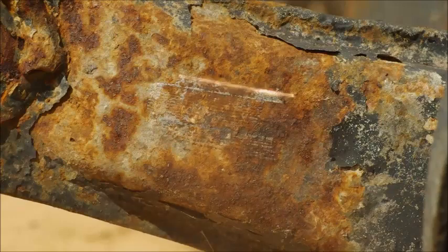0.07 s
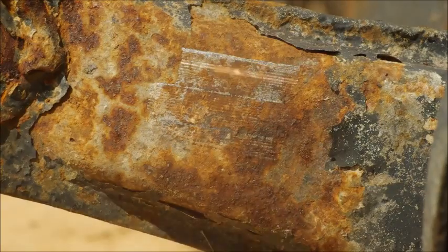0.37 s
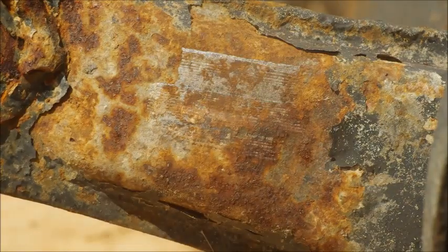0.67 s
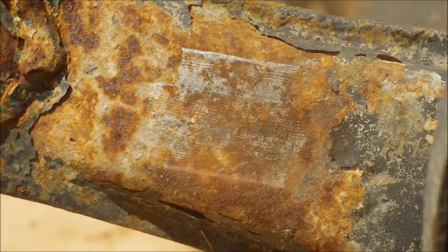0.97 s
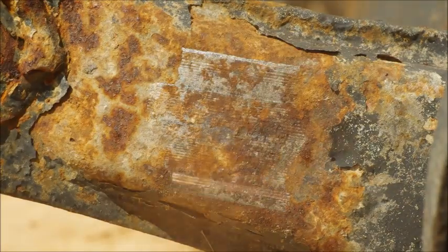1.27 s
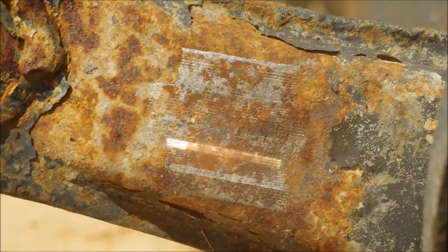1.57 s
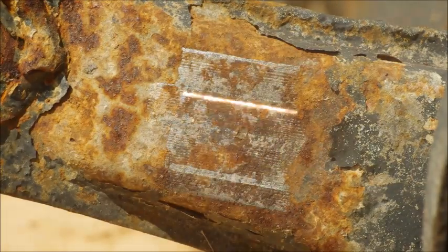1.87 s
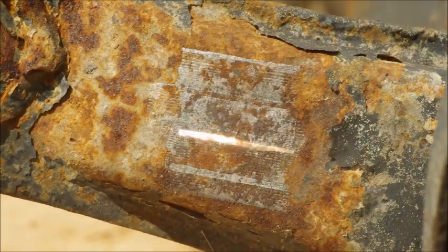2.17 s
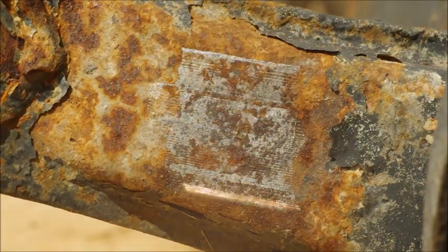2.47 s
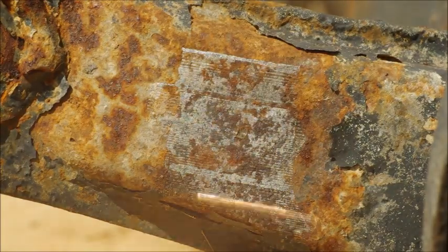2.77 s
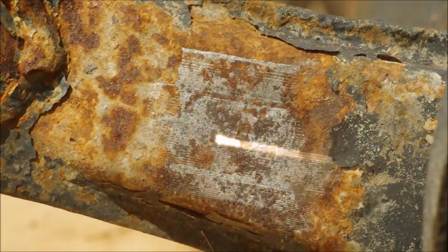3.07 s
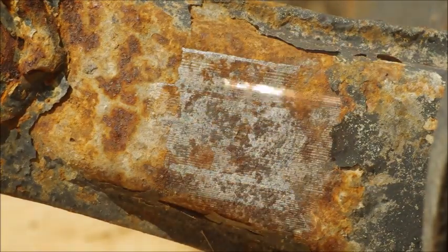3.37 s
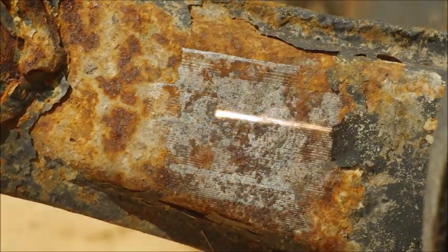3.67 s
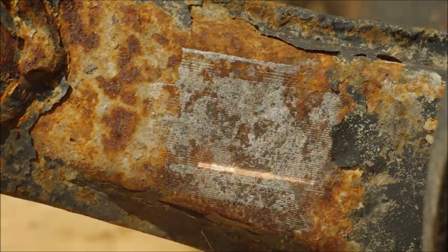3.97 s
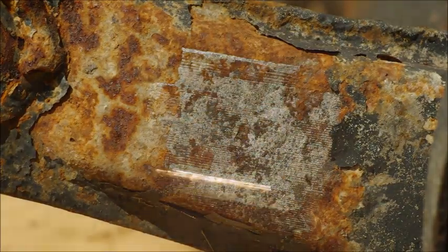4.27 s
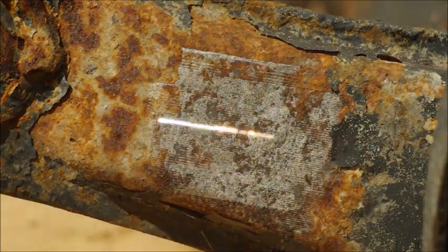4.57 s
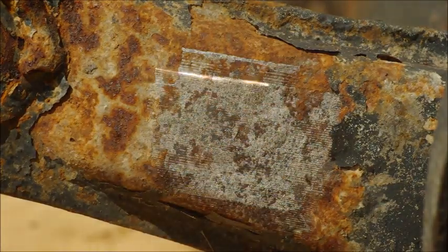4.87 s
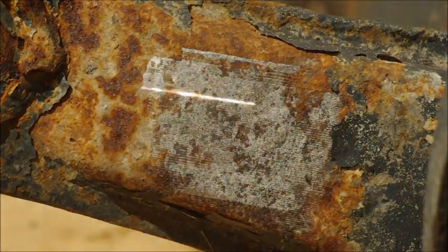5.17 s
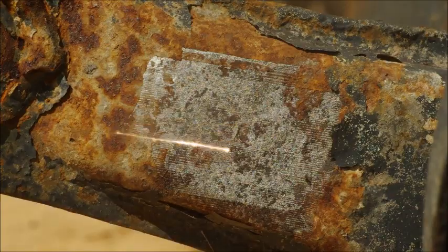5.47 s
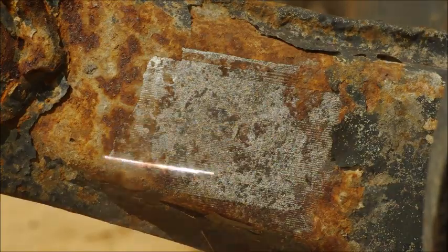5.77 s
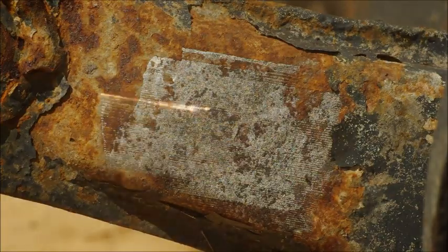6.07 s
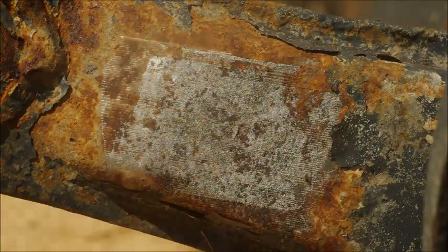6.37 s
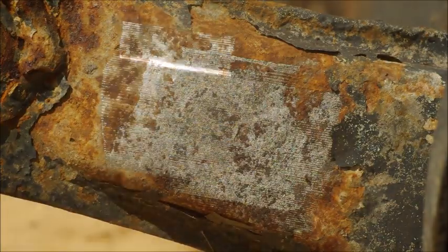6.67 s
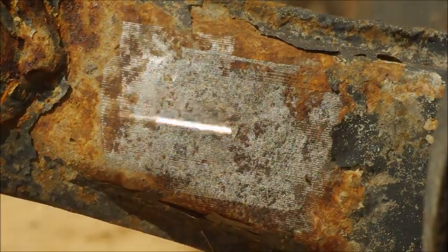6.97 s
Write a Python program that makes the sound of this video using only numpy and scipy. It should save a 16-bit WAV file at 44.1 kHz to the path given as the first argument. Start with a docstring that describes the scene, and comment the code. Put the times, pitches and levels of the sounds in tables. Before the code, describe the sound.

Close, continuous sizzling and raspy buzzing from a laser sweeping over rusty metal, with small crackles and faint air buffeting.

```python
"""Laser rust removal, close up.

A cleaning laser sweeps a line on a steel part in a workshop. Bursting rust sizzles; each sweep meets
nearly the same patches, so it buzzes. Narrow peaks colour the hiss and give a faint hum near 575 Hz.
The line is led up and down, which shifts close reflections. At instants the hiss gives way to glassy
tones. Moving air buffets the microphone."""
import sys
import numpy as np
from scipy import signal
from scipy.fft import rfft, irfft, next_fast_len
from scipy.io import wavfile
from scipy.ndimage import uniform_filter1d, map_coordinates

SR = 44100
rng = np.random.default_rng(int(sys.argv[2]) if len(sys.argv) > 2 else 0)


def store_wav(level_fs):
    """Save 16-bit WAV to argv[1]."""
    pcm = np.round(np.clip(np.atleast_2d(level_fs), -1, 1) * 32767)
    wavfile.write(sys.argv[1], SR, pcm.T.astype(np.int16))


N = 314433
SCAN_HZ, TOP_HZ = 91.74, 15650


def ablation(body_depth, rasp_depth, hiss_trim_db, rasp_trim_db):
    """Hiss, rasp and spits of bursting rust; hiss and rasp throb once a sweep."""
    # burst spectra: f/Hz, level/dB
    hiss_spectrum = [(300, -40), (1500, -18.5), (2000, -13), (2500, -5.5), (3200, -7), (4000, -5),
                     (5500, 2), (6400, -2.5), (7500, 0), (8700, -1), (10000, -7.5), (12000, -6.5),
                     (14000, -15), (15700, -21)]
    rasp_spectrum = [(40, -37), (120, -21.5), (270, -5), (550, 0), (850, 2), (1600, -2.5), (2500, -4.5),
                     (5000, -75), (15000, -45.5)]
    repeat_share = 0.68 + 0.22 * line_height()  # sweeps are more alike towards the top
    peaks = narrow_peaks()
    hiss_response = colour(hiss_spectrum) * peaks
    throb = throbbing(patch_db=1.5, flake_db=2.5)
    source = sweep_bursts(repeat_share, memory=0.52, blur_hz=5000)
    # thick rust gives bigger, lower bursts, so the body throbs more deeply than the top
    body_band = 1 / (1 + (bins() / 4400) ** 6)
    body = filtered(unit(source * throb ** body_depth), hiss_response * body_band)
    top = filtered(unit(source * throb), hiss_response * (1 - body_band))
    hiss = unit(brighten(body + top, body_share=0.83, middle_share=0.58))
    rasp = sweep_bursts(repeat_share, memory=0.58, blur_hz=4500) * throb ** rasp_depth
    rasp = unit(filtered(rasp, colour(rasp_spectrum) * peaks))
    hiss_gain, rasp_gain = flaring(rasp_bed_db=-47)
    sizzling = hiss * hiss_gain * undb(hiss_trim_db) + rasp * rasp_gain * undb(rasp_trim_db)
    return sizzling + spitting(hiss_response)


def sweep_bursts(repeat_share, memory, blur_hz):
    """Each sweep partly repeats the last one's pressure wave, most clearly in the midrange."""
    f = bins()
    feedback = memory * np.exp(-(f / blur_hz) ** 2) * f / np.hypot(f, 280)
    comb = np.sqrt(1 - feedback ** 2) / (1 - feedback * np.exp(-2j * np.pi * f / SCAN_HZ))
    repeated = filtered(sizzle(spread_db=2.5), comb)
    return np.sqrt(repeat_share) * repeated + np.sqrt(1 - repeat_share) * sizzle(spread_db=4.5)


def sizzle(spread_db):
    """Dense stream of tiny bursts of unequal size; rms 1."""
    return unit(rng.standard_normal(N) * undb(spread_db * rng.standard_normal(N)))


def throbbing(patch_db, flake_db, swing_start_s=0.075, limit_db=4):
    """Burst strength as the mirror swings the spot over thick and thin rust; mean power 1."""
    # extra bite at one end of the line (negative: the other end is rustier): t/s, level/dB
    rust_imbalance = [(.12, 0), (.3, 7), (.46, 6), (.54, 9), (.87, 8.5), (1.25, 4.5), (1.45, 3.5),
                      (1.62, -1), (1.92, 3), (2.1, 0.5), (2.65, 1), (2.8, -12), (2.92, -2), (3.1, 7.5),
                      (3.45, 7), (3.95, -1), (4.4, -2), (4.73, -5.5), (5.25, 2), (5.6, -6), (5.83, 1),
                      (5.93, 11), (6.04, -4), (6.45, -7.5), (6.62, 9), (6.9, 6.5), (7.05, 2.5)]
    place = np.abs(2 * ((times() - swing_start_s) * SCAN_HZ % 1) - 1)  # 0..1 along the line
    bite_db = curve(rust_imbalance) / 2 * np.tanh((place - 0.55) / 0.16)  # rust edge near mid-line
    bite_db += patch_db * patches(place, across=10.54, per_s=5.5)  # broad patches last many sweeps
    bite_db += flake_db * patches(place, across=13.44, per_s=70)  # flakes last about one
    return evened(np.tanh(evened(undb(bite_db)) / undb(limit_db)))  # beam power caps the bite


def flaring(rasp_bed_db):
    """Gains of hiss and rasp: each rust patch swells and fades over the steady bite."""
    # steady hiss between flares: t/s, level/dB
    hiss_bed = [(0.07, -34.5), (1.2, -32.5), (2.3, -27.5), (2.72, -33.5), (3.2, -29.5), (4.6, -27),
                (5.6, -30), (7.13, -30.5)]
    # rust patches crossed, loose rust adding rasp: centre t/s, length/s, hiss level/dB, rasp level/dB
    flares = [(0.082, 0.1, -29, -44), (0.194, 0.2, -34, -69), (0.425, 0.08, -30.5, -50),
              (0.577, 0.26, -33.5, -49), (0.7, 0.082, -29, -42.5), (0.854, 0.24, -28.5, -39.5),
              (1.147, 0.37, -35, -39.5), (1.313, 0.068, -30.5, -52), (1.403, 0.1, -44, -48),
              (1.517, 0.12, -25, -43.5), (1.608, 0.07, -25, -58), (1.683, 0.14, -29.5, -46),
              (2.085, 0.21, -27.5, -42.5), (2.24, 0.11, -33.5, -63), (2.506, 0.078, -26, -47.5),
              (2.62, 0.078, -29.5, -65.5), (2.831, 0.057, -30, -48), (3.05, 0.22, -28, -48.5),
              (3.465, 0.16, -30, -44.5), (3.78, 0.15, -32.5, -48.5), (4.148, 0.13, -33, -46),
              (4.494, 0.17, -29.5, -45), (4.71, 0.18, -33, -49), (4.955, 0.31, -28.5, -45),
              (5.314, 0.051, -25.5, -45), (5.318, 0.37, -27, -46), (5.86, 0.41, -28.5, -47),
              (5.978, 0.044, -29, -47), (6.333, 0.28, -28, -45.5), (6.66, 0.05, -28.5, -42.5),
              (6.73, 0.13, -32, -49), (6.837, 0.08, -29, -44), (7.03, 0.3, -26, -44.5)]
    t = times()
    hiss_power, rasp_power = undb(curve(hiss_bed)) ** 2, undb(rasp_bed_db) ** 2
    for centre_s, length_s, hiss_db, rasp_db in flares:
        distance = np.minimum(np.abs(2 * (t - centre_s) / length_s), 10)
        swell = np.exp(-distance ** 4.7)  # flat top, steep sides
        hiss_power += swell * undb(hiss_db) ** 2
        rasp_power += swell * undb(rasp_db) ** 2
    return np.sqrt(hiss_power), np.sqrt(rasp_power)


def brighten(x, body_share, middle_share):
    """Tilt the hiss over time: bare steel is brighter, rust duller."""
    # top treble, used about its mean: t/s, level/dB
    treble = [(.1, -5), (.7, -7), (1.2, -8), (1.55, -5.5), (2.5, -4.5), (2.8, -7), (3.05, -3.5),
              (4.6, -4.5), (5.2, -7.5), (5.65, -5.5), (5.9, -7.5), (6.7, -8.5), (7.1, -7.5)]
    tilt_db = curve(treble)
    tilt_db -= tilt_db.mean()
    body = filtered(x, 1 / (1 + (bins() / 4400) ** 6))
    top = filtered(x, 1 - 1 / (1 + (bins() / 9500) ** 8))
    middle = x - body - top
    return body * undb(-body_share * tilt_db) + middle * undb(middle_share * tilt_db) + top * undb(tilt_db)


def spitting(hiss_response, attack_s=0.0026, release_s=0.012, dull_hz=5500):
    """Single flakes burst off, each a short crack duller than the hiss."""
    # flake cracks: t/s, peak level/dB
    spits = [(0.641, -27), (0.707, -26), (1.0, -29), (2.513, -28), (4.151, -24.5), (4.17, -26),
             (5.404, -30), (6.338, -29), (6.649, -24), (6.657, -27), (6.668, -34)]
    cracks = pulses(spits, attack_s, release_s) * rng.standard_normal(N)
    return filtered(cracks, unit(hiss_response / np.hypot(1, bins() / dull_hz)))


def narrow_peaks():
    """Narrow peaks and hollows that colour the hiss, including a faint steady hum near 575 Hz."""
    # peaks (+) and hollows (-): f/Hz, width/Hz, gain/dB
    peaks = [(321, 20.4, 10), (473, 32.5, 5), (575, 11, 10.5), (814, 53, 7), (947, 125, 5.5),
             (1124, 24.6, 8.5), (1293, 43, 5.5), (1634, 72.4, 9), (1810, 47, 2.5), (1980, 60, 6),
             (2257, 52, 6), (2505, 84, 3), (2870, 41, -1), (2917, 84, 5), (3168, 93, 5), (3520, 66, 4.5),
             (3797, 146, 4.5), (4153, 87, 3), (4270, 106, -4), (6720, 215, 3.5), (7220, 145, -7.5),
             (7510, 190, 3), (8790, 130, -11), (10600, 390, 0), (11650, 310, -6)]
    f = bins() + 1
    response = 1
    for hz, width_hz, db in peaks:
        band = 1 / (1 + 1j * (f ** 2 - hz ** 2) / (f * width_hz))
        response = response * (1 + (undb(db) - 1) * band)
    return response


def line_height():
    """Height of the line on the part, about -1 (bottom) to 1 (top); steady speed between turns."""
    # turning points: t/s, height
    turns = [(0, .25), (.44, .95), (1.28, -.85), (2.05, .6), (2.8, -1.1), (3.57, .8), (4.33, -.9),
             (5.14, .9), (5.88, -.75), (6.63, 1.15), (7.13, 0)]
    return curve(turns)


def reflections(x, ledge_ms=1.1):
    """Close reflections change delay and strength with the line's height, moving notches in the hiss."""
    # faces and edges (edges flip the sign): mid-height delay/ms, gain, extra delay/ms and gain at the top
    faces = [(.172, -.205, .012, -.086), (.319, .29, .04, .017), (.42, -.03, .038, .032),
             (.535, .107, .04, .036), (.738, .063, .03, .01), (.805, .067, .01, .023),
             (1.088, .083, .003, -.046), (1.13, -.11, -.016, -.038), (1.338, .08, 0, -.026),
             (1.406, 0, .005, .062), (1.628, .056, .004, .007), (2.429, .037, .024, .006),
             (3.162, .03, .023, -.013)]
    # one more edge, strong during the first pass: t/s, gain
    ledge = [(0, -.15), (.5, -.22), (1, -.13), (1.4, 0)]
    height = line_height()
    paths = [(ms + extra_ms * height, gain + extra * height) for ms, gain, extra_ms, extra in faces]
    paths.append((ledge_ms, curve(ledge)))
    oversampled = signal.resample_poly(x, 4, 1)
    grid_s = np.arange(len(oversampled)) / (4 * SR)
    echoes = sum(gain * np.interp(times() - ms / 1000, grid_s, oversampled) for ms, gain in paths)
    return (x + echoes) / np.sqrt(1 + sum(gain ** 2 for _, gain in paths))


def glassy(x, tone_db, ring_s=0.024, full_length_s=0.028, half_span=2048):
    """The hiss drops away for an instant and a glassy cluster of tones rings through."""
    # dips in the hiss: centre t/s, length/s, depth/dB
    dips = [(.654, .013, 12), (1.295, .012, 12), (1.872, .014, 17), (2.247, .03, 28), (2.308, .029, 28),
            (2.459, .029, 28), (2.628, .028, 28), (2.981, .011, 12), (3.363, .014, 17), (3.898, .014, 17),
            (4.026, .013, 17), (4.132, .014, 15), (4.431, .014, 15), (5.198, .012, 12), (5.754, .012, 12),
            (6.215, .029, 28), (6.905, .01, 11)]
    # spectrum of the tones: f/Hz, level/dB
    tone_spectrum = [(200, -15), (1800, -13), (2600, -2), (3800, 0), (4600, -7), (5600, -1), (8300, 0),
                     (10000, -10), (15700, -21)]
    out = x.copy()
    t = np.arange(-half_span, half_span) / SR
    heard = bins() < TOP_HZ
    hz, weight = bins()[heard], np.abs(colour(tone_spectrum) * narrow_peaks())[heard]
    for centre_s, length_s, depth_db in dips:
        centre = int(centre_s * SR)
        span = slice(centre - half_span, centre + half_span)
        local_rms = x[centre - half_span // 2:centre + half_span // 2].std()
        strength = min(length_s / full_length_s, 1) ** 0.3  # shorter dips ring more faintly
        ring = strength * np.exp(-np.abs(t / ring_s) ** 3)
        dip = undb(-depth_db * np.exp(-np.abs(2 * t / length_s) ** 3.5))
        tones = tone_cluster(t, hz, weight, count=44) * local_rms * ring * undb(tone_db)
        out[span] = out[span] * dip * np.sqrt(1 - 0.5 * ring ** 2) + tones
    return out


def tone_cluster(t, hz, weight, count):
    """Sines at random pitches, denser and louder where the weight is high; rms 1."""
    cumulative = np.cumsum(weight ** 1.3)
    jitter, phase = rng.random((count, 2)).T
    quantiles = (np.arange(count) + 4 * jitter) / count % 1
    picks = np.searchsorted(cumulative, cumulative[-1] * quantiles)
    sines = np.sin(2 * np.pi * (np.outer(hz[picks], t) + phase[:, None]))
    return unit(weight[picks] ** 0.7 @ sines)


def buffeting(breeze_flutter_db, gust_trim_db, quick_ratio):
    """Eddies thud on the microphone: restless breeze and short gusts; quick eddies thud higher."""
    # faint air between gusts: t/s, level/dB
    breeze_levels = [(.1, -69), (.8, -69), (1.3, -58), (2.9, -58), (3.3, -67), (3.7, -66), (4.15, -72),
                     (4.5, -54), (5.05, -55), (5.45, -69), (5.9, -61.5), (6.15, -66), (6.4, -83)]
    # gusts: t/s, peak level/dB before trim
    gusts = [(0.097, -60), (0.131, -48), (0.175, -51), (0.442, -56), (0.978, -53), (1.17, -49),
             (1.248, -41.5), (1.307, -40), (1.352, -52), (1.441, -54), (1.483, -49), (1.543, -43),
             (1.576, -51), (1.641, -55), (1.768, -39), (1.818, -39.5), (1.866, -41), (1.931, -49),
             (1.999, -42), (2.197, -41), (2.273, -43), (2.418, -42.5), (2.522, -43.5), (2.717, -46),
             (2.778, -39.5), (2.811, -45), (3.034, -48), (3.079, -45), (3.109, -51), (3.145, -48),
             (3.267, -51), (3.345, -54), (3.489, -47), (3.526, -49), (3.826, -58), (4.304, -52),
             (4.362, -51), (4.409, -55), (4.445, -45), (4.511, -54), (4.565, -48), (4.647, -53),
             (4.715, -49), (4.791, -44), (4.89, -49), (4.923, -63), (5.153, -50), (5.216, -55.5),
             (5.785, -59)]
    # small, quick eddies in the gusts: t/s, power share
    quick_eddies = [(1.3, 0.1), (1.8, .4), (2.25, 1), (2.75, 0.03)]
    # eddy spectrum: f/Hz, level/dB
    air_spectrum = [(20, -40), (45, -36), (75, 3), (115, 5.5), (170, 5), (250, -6), (400, -7.5),
                    (1000, -39), (4000, -90)]
    stirring = np.tanh(patches(np.zeros(N), across=1, per_s=32))  # either stirring or slack
    low = colour(air_spectrum)
    high = colour([(hz * quick_ratio, db) for hz, db in air_spectrum])
    breeze, slow, quick = (unit(filtered(rng.standard_normal(N), band)) for band in (low, low, high))
    breeze *= undb(curve(breeze_levels)) * unit(undb(breeze_flutter_db * stirring))
    quick_share = curve(quick_eddies)
    thuds = np.sqrt(1 - quick_share) * slow + np.sqrt(quick_share) * quick
    thuds = evened(thuds, window=900) * pulses(gusts, attack_s=0.024, release_s=0.026)
    return breeze + thuds * undb(gust_trim_db)


def workshop(x, t60_s, wet_db):
    """Faint, short wash from the walls."""
    t = np.arange(SR // 2) / SR
    tail = rng.standard_normal(len(t)) * undb(-60 * t / t60_s) * (t > 0.006)
    return x + undb(wet_db) * signal.fftconvolve(x, tail / np.linalg.norm(tail))[:N]


def patches(place, across, per_s):
    """Random field, rms 1: `across` patches along the line, renewed per_s times a second."""
    grid = rng.standard_normal((1024, 64))
    field = unit(map_coordinates(grid, [times() * per_s, place * across], order=1, mode="grid-wrap"))
    return unit(np.tanh(field / 2))


def pulses(events, attack_s, release_s):
    """Gain with one triangle per (t/s, peak level/dB) row."""
    t = times()
    return sum(undb(db) * np.interp(t, [s - attack_s, s, s + release_s], [0, 1, 0]) for s, db in events)


def evened(x, window=int(5 * SR / SCAN_HZ)):
    """Scale to running mean power 1; window in samples, five sweeps by default."""
    return x / np.sqrt(uniform_filter1d(x ** 2, window))


def filtered(x, response):
    """Apply a response given on bins()."""
    size = next_fast_len(N + SR)
    return irfft(rfft(x, size) * response, size)[:N]


def colour(points):
    """Response through (f/Hz, level/dB) points, log frequency axis."""
    hz, db = np.transpose(points)
    return undb(np.interp(np.log(bins() + 1), np.log(hz), db))


def curve(points):
    """(t/s, value) points as one value per sample."""
    return np.interp(times(), *np.transpose(points))


def bins():
    """FFT bin frequencies in Hz."""
    return np.fft.rfftfreq(next_fast_len(N + SR), 1 / SR)


def times():
    """Sample times in s."""
    return np.arange(N) / SR


def undb(db):
    """dB to gain."""
    return 10 ** (np.asarray(db) / 20)


def unit(x):
    """Scale to rms 1."""
    return x / np.sqrt(np.mean(x ** 2))


def scene(beam_on_s=0.069):
    """Laser and air start together when the beam comes on; mono."""
    gate = np.clip((times() - beam_on_s) / 0.00018, 0, 1)
    laser = reflections(ablation(body_depth=1.39, rasp_depth=0.29, hiss_trim_db=0.5, rasp_trim_db=5.5))
    air = buffeting(breeze_flutter_db=4.5, gust_trim_db=2.0, quick_ratio=1.34)
    room = workshop(gate * (laser + air), t60_s=0.037, wet_db=-20)
    return glassy(room, tone_db=-0.25)[None]


def record(dry):
    """Steep low-pass at TOP_HZ."""
    return signal.sosfilt(signal.ellip(12, 0.1, 80, TOP_HZ, fs=SR, output="sos"), dry)


dry = scene()
out = record(dry)
store_wav(out)
```